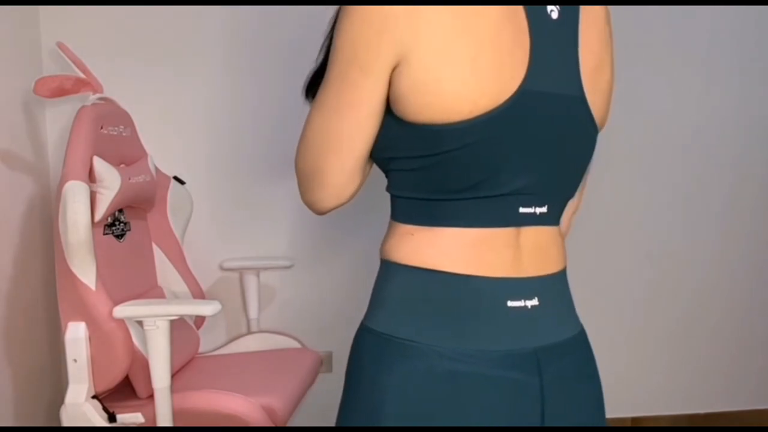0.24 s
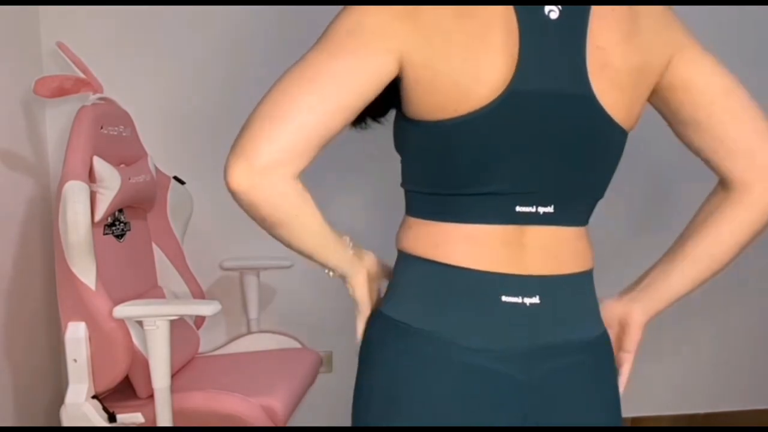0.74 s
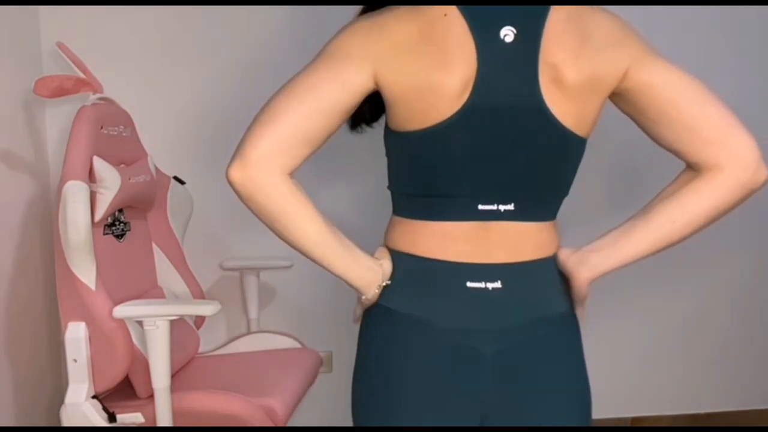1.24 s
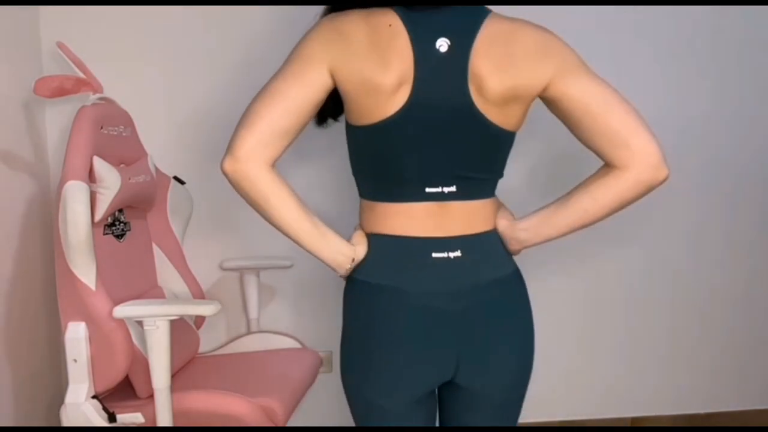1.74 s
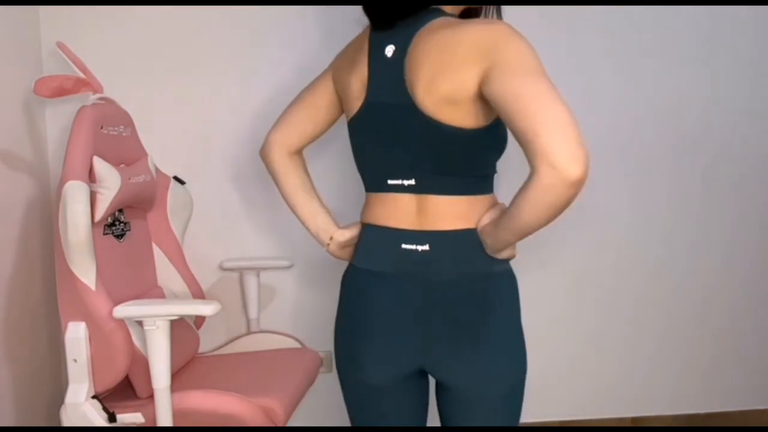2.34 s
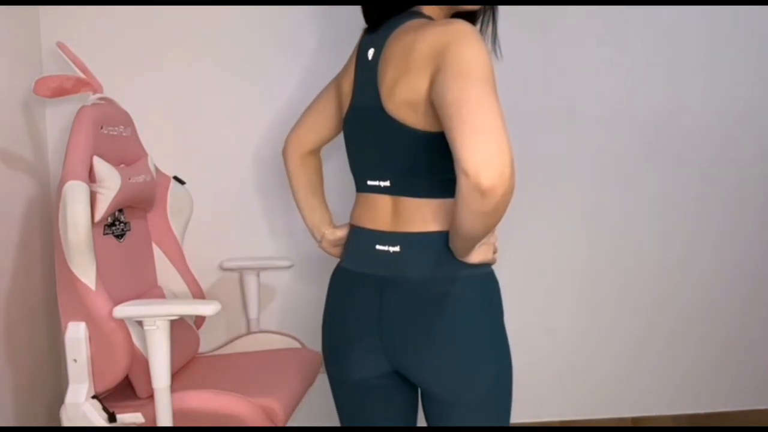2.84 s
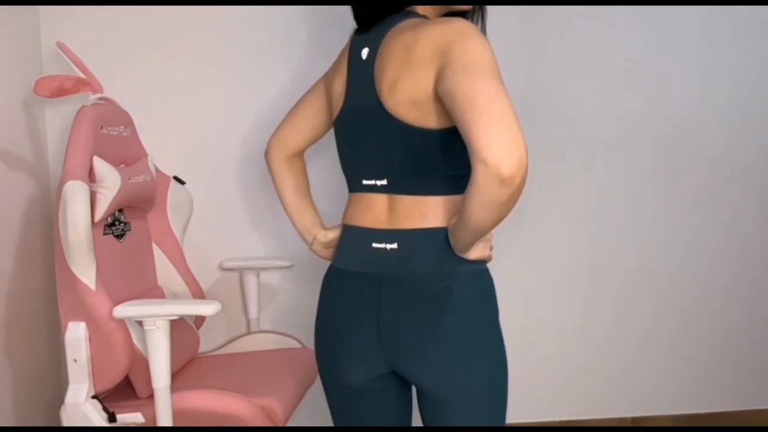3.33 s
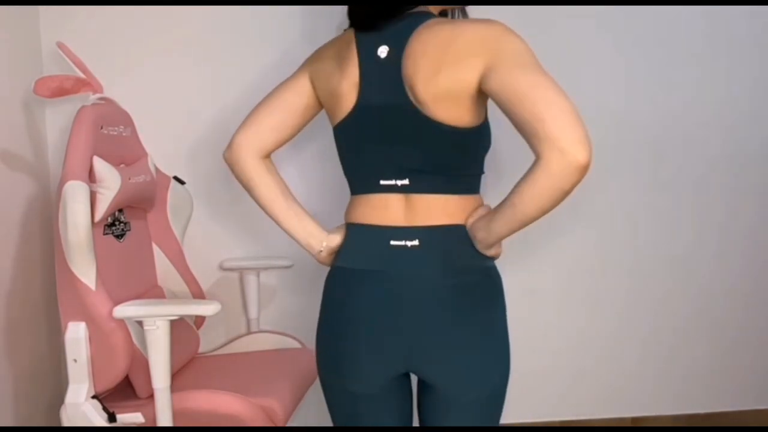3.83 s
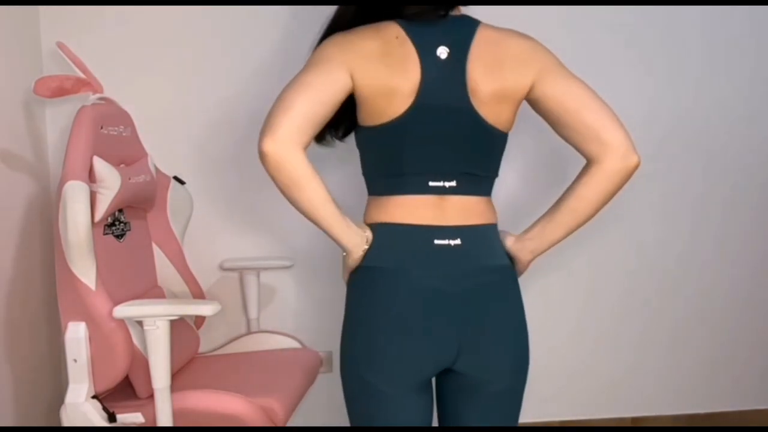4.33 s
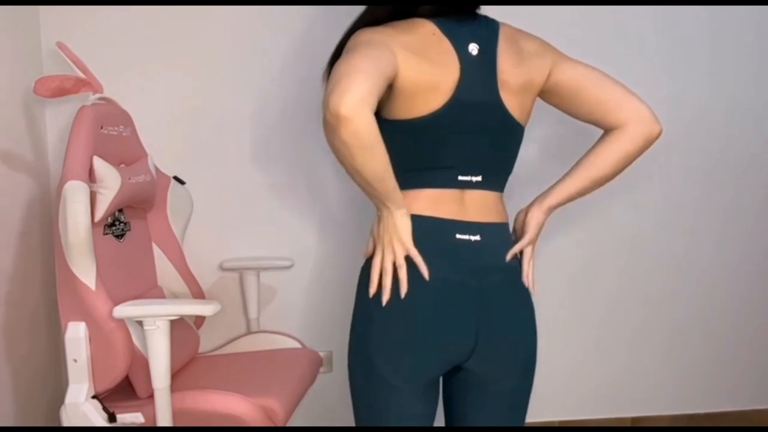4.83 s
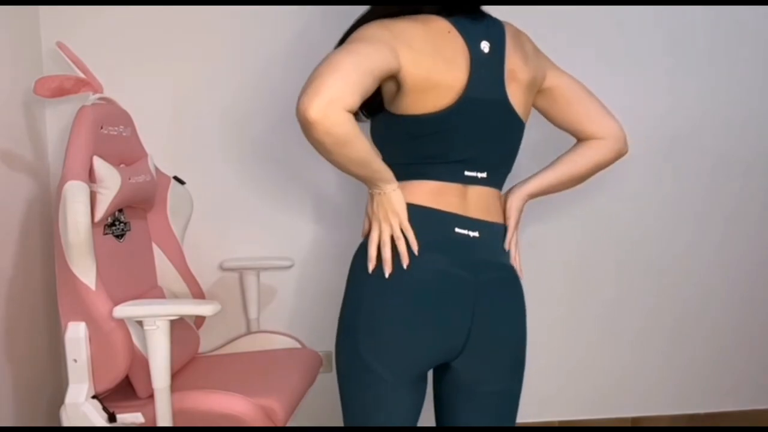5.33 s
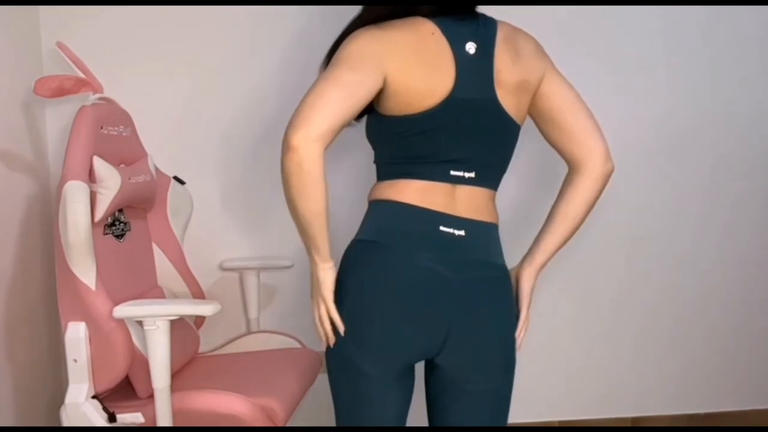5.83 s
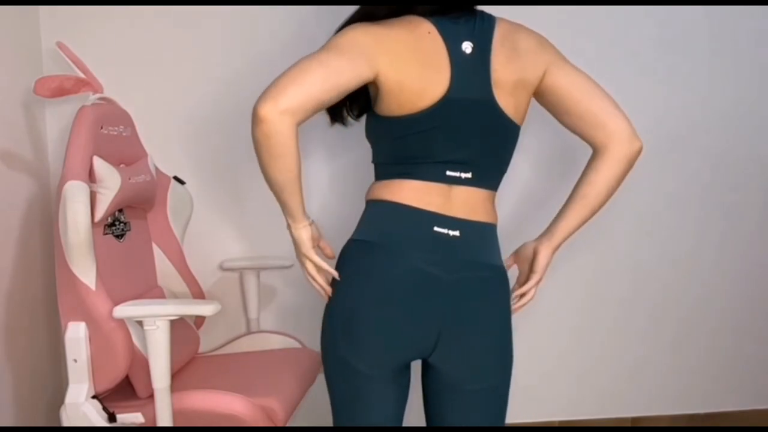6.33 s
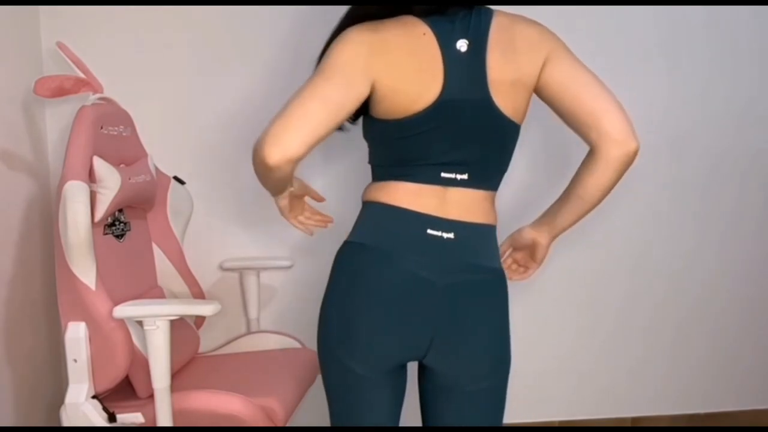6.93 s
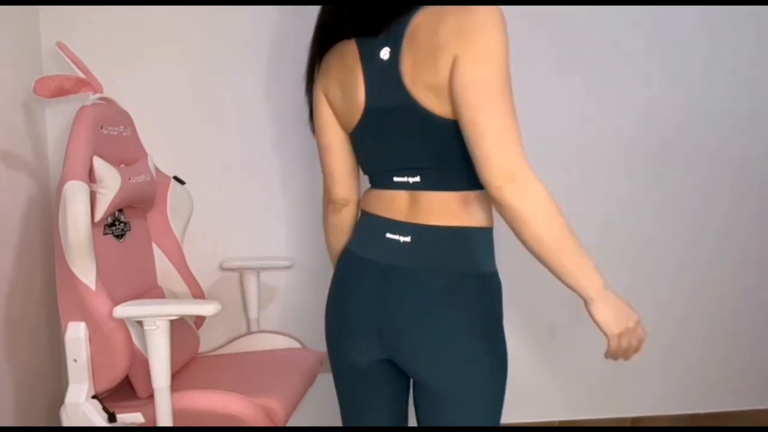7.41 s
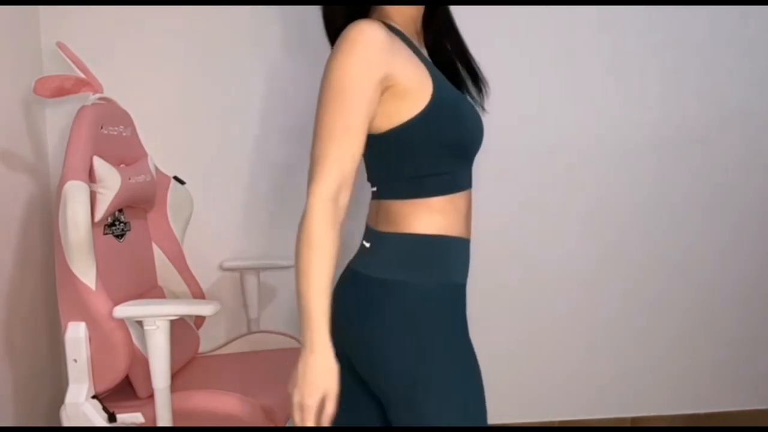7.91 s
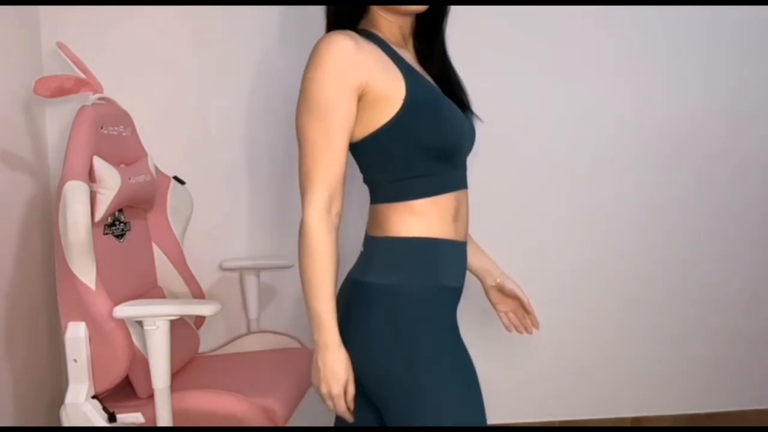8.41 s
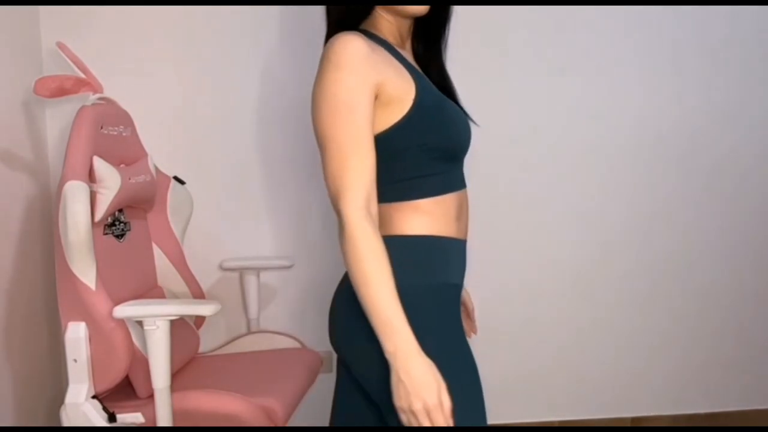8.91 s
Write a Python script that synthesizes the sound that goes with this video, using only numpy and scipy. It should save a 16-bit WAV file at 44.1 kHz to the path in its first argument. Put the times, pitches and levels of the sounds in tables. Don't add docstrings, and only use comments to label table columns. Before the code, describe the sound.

Low muffled thumps and bumps on a clothing-worn microphone, with faint patchy fabric rustle, small ticks and a few sharp knocks in a quiet room.

```python
import sys
import numpy as np
from scipy import signal
from scipy.io import wavfile

SR = 44100
rng = np.random.default_rng(int(sys.argv[2]) if len(sys.argv) > 2 else 0)


def to_wav(sig):
    pcm = np.clip(np.atleast_2d(sig), -1, 1) * 32767
    pcm = np.round(pcm).astype(np.int16)
    wavfile.write(sys.argv[1], SR, pcm.T)


def gain_from_decibels(decibels):
    exponent = np.asarray(decibels, float) / 20
    return 10 ** exponent


N = 404037

# f/Hz, density/dB
ROOM_SPECTRUM = [(200, -17), (400, 1.5), (900, -3.5), (1700, -19.5), (7000, -29), (11000, -15.5),
                 (17500, -22)]
# middle t/s, length/s, level/dB, pitch f/Hz
FOLD_WHISPERS = [(.275, .06, -68, 1600), (.565, .07, -66, 1800), (.93, .06, -60, 450),
                 (.99, .04, -62, 2050), (1.46, .14, -57, 3600), (1.85, .12, -55, 2300),
                 (2.19, .15, -60, 500), (2.75, .12, -58, 1800), (3.67, .1, -58, 500),
                 (4.08, .08, -54, 2000), (4.2, .25, -58, 2100), (5.11, .1, -54, 500), (6.04, .1, -58, 2400),
                 (6.16, .14, -55, 2400), (6.28, .08, -55, 2600), (6.44, .14, -63, 500),
                 (7.06, .04, -59, 500), (7.17, .05, -50, 400), (7.54, .06, -56, 600), (7.77, .08, -61, 500),
                 (8.2, .25, -57, 2000), (8.8, .07, -58, 500), (6.69, .04, -60, 2100),
                 (1.33, .05, -58, 2400)]
# t/s, peak level/dB, ring f/Hz, t60/ms
HOUSING_RINGS = [(7.0321, -30, 2000, 3.5), (7.1485, -34, 950, 18), (7.0882, -38, 2300, 4),
                 (7.1524, -35, 2400, 4), (7.301, -38, 1150, 10), (8.665, -41, 650, 14),
                 (8.7516, -34, 1550, 9), (8.7518, -37, 2800, 6), (6.895, -41, 450, 20),
                 (6.3703, -25, 950, 7), (6.5261, -27, 1800, 4.5), (8.666, -44, 2000, 10)]
# t/s, peak level/dB, hiss over peak/dB, ring f/Hz,
# length/ms
TICKS_AND_CRUNCHES = [(1.581, -38, -8, 1700, 3.0), (2.294, -38.5, -17, 3640, 8.7), (3.273, -37, -12, 2220, 5),
                      (3.458, -28.5, -6.5, 1190, 5.6), (3.53, -32, -14, 1180, 6.2), (6.638, -47, -14, 1500, 4),
                      (6.663, -42, -10, 2000, 5), (6.813, -51, -7, 1580, 5.4), (6.86, -52, -13, 1400, 4.6),
                      (6.894, -39, -3, 900, 8), (6.981, -50, -13, 2070, 4.8), (7.084, -33, -6, 1490, 7),
                      (7.147, -31, -6, 820, 7), (7.204, -45, -5, 1960, 7.6), (7.23, -36, -12, 1010, 4.8),
                      (7.301, -28, -6, 980, 3.7), (7.324, -34, -7, 829, 9), (7.62, -35, -12, 970, 7),
                      (7.83, -47, -5, 1180, 2), (8.6615, -36, -3, 1920, 9.1), (8.7495, -33, -4, 2200, 5),
                      (8.786, -37, -3, 2100, 7), (8.819, -36, -3, 2030, 6.7), (8.853, -40.5, 1, 1980, 5.7),
                      (6.389, -40, -14, 2600, 1.9), (6.519, -40, -5, 1600, 8), (7.032, -40, -6, 2000, 2.4),
            (3.425, -38, -25, 600, 8.7), (3.5, -35, -25, 450, 16), (3.552, -37.5, -25, 830, 22),
            (3.578, -42, -20, 700, 20), (4.705, -38, -25, 700, 80), (3.49, -38, -25, 350, 66),
            (4.84, -37, -25, 390, 75), (2.291, -33.5, -22, 530, 8), (7.47, -40, -7, 1070, 25.5)]
# t/s, peak level/dB, hiss over peak/dB, ring f/Hz, length/ms
TINY_FLICKS = [(7.357, -34, -25, 520, 5), (7.073, -44, -8, 2000, 4), (7.9165, -50, 6, 3000, 2),
               (7.855, -55, 6, 3000, 5), (8.473, -55, 10, 3000, 3), (6.815, -50, 0, 2500, 2),
               (1.582, -41, 0, 1500, 1.6), (6.6, -58, 4, 3000, 3), (7.3715, -33, -25, 450, 5),
               (7.143, -40, -10, 1500, 9), (1.144, -40, -20, 600, 7), (6.509, -47, -8, 2700, 9),
               (7.329, -39, -15, 2000, 4)]
# t/s, peak level/dB, rise/ms
HOUSING_SNAPS = [
    (6.3708, -17, 0.97),
    (7.3693, -11, 0.33),
    (7.3278, -26, .4),
    (7.1524, -28, .5),
]

# f/Hz, density/dB
FIBRE_SPECTRUM = [(1800, -35), (3300, 0), (4500, 2), (5800, -0.5), (7200, 3), (8800, -1), (11500, -9.5)]
# f/Hz, density/dB
WEAVE_SPECTRUM = [(750, -16), (1200, 1), (1550, -2.5), (2200, 1), (3000, -2.5), (5500, -20.5)]
# f/Hz, density/dB
DRAG_SPECTRUM = [(120, -0.5), (250, -1), (450, -6), (800, -7.5), (1600, -34.5)]
# f/Hz, density/dB
SIZZLE_SPECTRUM = [(7000, -22), (10500, -11), (13000, -1.5), (17500, -4)]
# t/s, fibre hiss level/dB, coarseness/dB, pressure on capsule/dB
CLOTH_CREEP = [(0, -60.5, -0.5, 3.5), (.22, -67.5, 3, 1.5), (.6, -64.5, 1.5, -0.5), (1.5, -58, -0.5, -3),
               (2.0, -57.5, 4, -0.5), (2.84, -62.5, 6, 1.5), (3.05, -55.5, 2, -1.5), (3.5, -50.5, 0.5, 1),
               (3.77, -50.5, 0.5, 0.5), (4.0, -60.5, 5, -1.5), (4.45, -48.5, -1, -5),
               (4.75, -53.5, 0.5, 4.5), (5.5, -54.5, 1, 0.5), (6.3, -60.5, 5.5, 0.5),
               (6.57, -72.5, 5.5, 2.5), (7.55, -57.5, 2.5, 2), (7.9, -62.5, 1.5, -1),
               (9.16, -64.5, 6.5, 1.5)]
# start t/s, length/s, fibre hiss level/dB, coarseness/dB
CLOTH_STROKES = [(0.227, .36, -69.5, -0.5), (0.888, .11, -57, -4.5), (1.007, .54, -57.5, -3),
                 (1.422, 0.15, -61.5, -3), (1.772, 0.39, -55.5, -3.5), (1.917, .07, -48, -11.5),
                 (2.023, 0.079, -55.5, -3), (2.134, 0.072, -49.5, -3), (2.227, 0.069, -61.5, 6),
                 (2.326, 0.48, -59.5, 0), (2.85, 0.23, -66, 0), (4.023, 0.13, -55.5, 3.5),
                 (4.158, 0.15, -52, -2), (4.378, 0.12, -64, -4), (4.511, .07, -51.5, -4),
                 (4.72, .42, -58.5, -1), (5.137, 0.23, -47, -7.5), (5.36, .18, -48.5, -4),
                 (5.577, 0.057, -52, -5.5), (5.657, .28, -55.5, -6), (5.974, 0.467, -57, 1.5),
                 (6.632, .31, -64.5, 6), (7.164, 0.052, -57.5, -2), (7.26, 0.1, -55, 0),
                 (7.5, 0.33, -68, 2), (7.977, 0.43, -54, -1.5), (8.405, .13, -57.5, 0.5),
                 (8.517, .14, -60.5, 0), (8.825, 0.23, -58, 0), (9.06, 0.071, -55, -1.5)]
# middle t/s, length/ms, change of sliding level/dB
SURGES = [(.61, 60, -5), (.80, 150, 2), (.99, 40, 3), (1.12, 60, -4), (1.32, 70, -0.5), (1.42, 90, 2),
          (1.68, 120, -2), (2.07, 80, -2), (2.11, 70, -3), (2.42, 120, -3), (3.01, 70, 2), (3.10, 110, -2),
          (3.34, 60, 3), (3.43, 50, 2), (3.57, 60, 2), (3.67, 80, 3), (3.715, 40, 3), (3.78, 50, -3),
          (3.86, 90, -3), (3.93, 120, 2), (4.15, 60, 1.5), (4.21, 70, -3), (4.33, 80, 4), (4.49, 80, -3),
          (4.63, 80, 3), (4.69, 40, -4), (4.75, 100, -3), (5.07, 55, -3), (5.25, 60, -3), (5.48, 55, -3),
          (5.52, 70, 3), (5.86, 130, -4), (6.10, 80, -2), (6.36, 70, 5), (6.46, 110, 3), (6.53, 100, 6),
          (6.60, 110, 2.5), (2.835, 70, -4), (6.85, 70, -4), (7.42, 60, -3), (7.85, 50, 3), (7.9, 90, -3),
          (6.68, 120, -3), (6.8, 120, -3), (7.10, 90, 4), (7.6, 50, -3), (8.16, 140, 4), (8.32, 80, -3),
          (8.38, 50, -2), (8.57, 60, -2), (8.74, 40, 3), (9.03, 50, -3)]
# t/s, sheen/dB, finest sizzle/dB
KNIT_TAUTNESS = [(0, -1, -1), (.8, 0, 0), (1.3, -3, -2), (1.95, 0, 4), (2.3, -1, 0), (2.9, 0, -2),
                 (3.3, 0, 2), (4.3, 0, 2), (5.0, -1, -4), (5.2, 1, 0), (5.5, 0, -2), (6.1, 0, -1),
                 (6.5, 1, 2), (6.7, -2, -2), (7.1, 1, 1), (7.55, 0, -5), (8.15, 1, 1), (9.16, -1, 0)]
# t/s, level/dB, length/ms
HISSING_SLIPS = [(5.1075, -35, 11.5), (5.134, -34, 12), (5.155, -39, 14), (6.892, -55, 18),
                 (7.045, -57, 13), (7.081, -58, 15), (7.135, -53, 21), (7.355, -51, 37), (7.262, -54.5, 26),
                 (7.54, -52, 29), (9.1, -55, 130), (8.21, -59, 62), (9, -59, 60), (5.168, -43, 60),
                 (5.8, -54, 56), (5.385, -48.5, 46), (.91, -59.5, 39), (2.55, -59, 60), (4.7, -48, 97),
                 (1.83, -53, 77), (6.26, -56, 64), (5.75, -55, 83), (1.3, -64, 60), (7.61, -58, 42),
                 (8.41, -55.5, 40), (2.292, -55, 16), (8.872, -55, 14), (8.79, -55, 16), (1.07, -57, 26)]

# t/s, sway level/dB, quick bumps over sway/dB
RESTLESSNESS = [(0.0, -51.5, -7), (2.47, -50, -5.5), (3.03, -55.5, -1), (3.47, -45.5, -3.5),
                (3.62, -43, -2), (3.83, -53, -2.5), (4.49, -52.5, -2.5), (4.74, -50, -4),
                (5.28, -45.5, -6.5), (5.71, -49.5, -6.5), (6.43, -43.5, -2), (6.94, -51.5, -4),
                (7.24, -43, -2), (7.53, -46, -4.5), (8.09, -52, -5), (8.54, -52, -6), (8.83, -48, -0.5),
                (9.16, -46, -2.5)]
# middle t/s, length/s, quick bumps level/dB
WEIGHT_TREMORS = [(.53, .15, -57), (1.46, .2, -55), (1.9, .14, -52), (2.207, 0.25, -52), (2.72, 0.22, -48),
                  (3.006, 0.13, -55), (4.11, 0.21, -52), (4.75, .25, -46), (5.79, 0.44, -49),
                  (7.742, 0.18, -48), (8.318, 0.21, -53), (8.917, 0.43, -53), (1.19, .08, -46),
                  (1.29, .1, -54), (1.76, .07, -48), (2.08, .05, -50), (2.41, .06, -49), (3.33, .05, -46),
                  (4.41, .1, -47), (4.55, .08, -53), (3.08, .2, -52), (.17, .15, -58), (6.0, .12, -51),
                  (5.61, .07, -49), (6.10, .06, -49), (6.24, .06, -46), (6.98, .06, -53), (7.65, .08, -45),
                  (8.0, .1, -56), (8.84, .06, -45), (9.0, .06, -45)]
# t/s, level/dB, contact/ms, direction (-1 pull, +1 push)
SHARP_KNOCKS = [(3.557, -25.5, 2.5, 1), (6.367, -20, 4.5, 1), (6.3698, -11, 2.02, 1), (6.3755, -21, 6.4, 1),
                (6.5227, -19, 5.5, -1), (7.0882, -25.5, 2, 1), (7.1532, -36, 2.2, 1),
                (7.3039, -27.5, 2.2, 1), (7.37, -24, 1.3, 1), (0.835, -43, 2.9, -1), (1.146, -31, 6.6, 1),
                (6.5218, -33, 1.8, 1), (6.5288, -31, 4, -1), (7.357, -29, 4, -1)]
# t/s, level/dB, contact/ms, direction (-1 pull, +1 push)
THREAD_TUGS = [
    (7.857, -36, 0.5, -1),
    (7.9163, -34, 1.4, -1),
    (7.9492, -34, 0.42, -1),
    (1.5817, -36, .4, 1),
    (7.975, -40, .35, -1),
    (8.0177, -35, .5, -1),
    (8.0513, -30, .12, -1),
    (7.0848, -32, 1.9, -1),
    (7.1508, -27, 2, -1),
    (7.1482, -32, 2, -1),
]
# t/s, level/dB, contact/ms, direction (-1 pull, +1 push)
HEAVY_JERKS = [
    (6.383, -23.5, 20, 1),
    (6.518, -15.5, 15, 1),
    (7.083, -16.5, 9.5, -1),
    (7.145, -15.5, 12.7, -1),
]
# t/s, level/dB, contact/ms
FOOT_ROLL = [
    (3.42, -27, 12.6),
    (3.459, -22, 10.6),
    (3.503, -23, 10),
    (3.53, -18, 6.5),
    (3.556, -20, 3.5),
    (3.577, -25, 5.4),
    (3.622, -26.5, 17),
]
# t/s, level/dB, contact/ms
TUGS_AWAY = [(1.407, -31, 16.4), (1.528, -36, 8.3), (2.549, -33, 12.6), (3.197, -30.5, 24),
             (3.29, -31.5, 10), (3.765, -32, 5.3), (4.372, -32, 9.6), (4.711, -28, 14),
             (4.724, -24.5, 10.4), (4.737, -33, 4.5), (4.85, -32, 6.6), (4.894, -29.5, 6.4),
             (5.109, -20.5, 11), (5.131, -20.5, 18), (5.288, -26, 27), (6.167, -32, 18), (6.286, -27, 10.5),
             (6.663, -28, 7), (6.679, -23.5, 10.3), (6.69, -19.5, 10.7), (6.892, -20, 14.6),
             (7.044, -30.5, 16), (7.205, -29.5, 10.5), (7.299, -14.5, 9), (7.321, -22, 14),
             (7.351, -25, 16), (7.37, -17, 12.2), (8.656, -32, 12), (8.856, -33, 10.4), (8.895, -34, 8.7),
             (8.255, -35, 12), (8.283, -36, 10), (8.323, -35, 14), (6.59, -35, 16), (1.922, -34, 12),
             (2.088, -34, 11), (9.094, -33, 14), (7.06, -32, 9)]
# t/s, level/dB, contact/ms
NUDGES_IN = [(1.049, -32.5, 8.7), (2.163, -33, 15), (2.263, -30.5, 8.9), (2.292, -26, 8.9),
             (2.492, -30.5, 8.1), (3.275, -27.5, 5.8), (3.605, -30.5, 4), (4.684, -33, 15),
             (5.162, -24.5, 16), (6.152, -30, 15), (6.268, -30.5, 12), (6.304, -27, 9.9),
             (6.712, -30.5, 14.5), (6.906, -33, 4.7), (8.58, -30, 23), (8.6675, -23.5, 12.5),
             (8.776, -32, 21), (1.188, -34, 12), (8.944, -34, 12), (8.988, -35, 11), (8.88, -33, 9)]

ROOM_DB = -64
FOLD_WIDTH = 0.22
ATTACK_S, RELEASE_S = 0.056, 0.053
DRAG_DB, DRAG_PER_COARSENESS, DRAG_PER_PRESSURE = -4, 0.85, 0.65
SIZZLE_DB, SIZZLE_PER_COARSENESS, SIZZLE_PER_PRESSURE = -9, 0.77, 1
SLIP_RASP_DB, SLIP_SHEEN_DB = -10.5, -5.5
BUMPS_FOLLOW = 0.51
MOUNT_HZ, MOUNT_Q = 41.8, 1.35
REBOUND_S, REBOUND_DB, REBOUND_MS = 0.0177, -11, 17.5
END_FADE_S = 0.045


def rms_one(x):
    return x / np.sqrt(np.mean(x ** 2) + 1e-20)


def in_time(rows):
    s, *columns = np.transpose(rows)
    return [np.interp(np.arange(N) / SR, s, column) for column in columns]


def drift(rate_hz):
    pole = np.exp(-80 * np.pi * rate_hz / SR)
    noise = rng.standard_normal(N // 40 + 2002)
    slow = signal.lfilter([1], [1, -2 * pole, pole * pole], noise)[2000:]
    return np.interp(np.arange(N) / 40, np.arange(len(slow)), rms_one(slow))


def band(x, low_hz, high_hz):
    edges = [low_hz, min(high_hz, 0.45 * SR)]
    return signal.sosfilt(signal.butter(2, edges, "band", fs=SR, output="sos"), x)


def bump(length_s):
    return np.hanning(int(length_s * SR))


def add(out, s, piece):
    at = round(s * SR)
    out[at:at + len(piece)] += piece[:N - at]


def slips(per_s, spread_db):
    sizes = gain_from_decibels(spread_db * np.minimum(rng.exponential(size=N), 4))
    signed = sizes * rng.choice([-1, 1], N)
    return rms_one(signed * (rng.random(N) < per_s / SR))


def coloured(sources, spectrum, patchy_db):
    hz, db = np.transpose(spectrum)
    edges = np.geomspace(hz[0], hz[-1], num=int(3 * np.log2(hz[-1] / hz[0])) + 2)
    out = np.zeros(N)
    for k, (low, high) in enumerate(zip(edges, edges[1:])):
        level_db = np.interp(np.log(low * high) / 2, np.log(hz), db)
        flicker = gain_from_decibels(level_db + patchy_db * drift(5.6))
        out += flicker * band(sources[k % 2], low, high)
    return rms_one(out)


def room():
    return gain_from_decibels(ROOM_DB - 3.5) * coloured(rng.standard_normal((2, N)), ROOM_SPECTRUM, patchy_db=5.0)


def folds():
    out = np.zeros(N)
    noise = rng.standard_normal((len(FOLD_WHISPERS), 16000))
    for (s, length_s, db, hz), air in zip(FOLD_WHISPERS, noise):
        swell = bump(length_s)
        whisper = rms_one(band(air, hz * (1 - FOLD_WIDTH), hz * (1 + FOLD_WIDTH)))
        add(out, s - length_s / 2, gain_from_decibels(db) * swell * whisper[-len(swell):])
    return out


def rings():
    out, t = np.zeros(N), np.arange(2000) / SR
    for s, db, hz, t60_ms in HOUSING_RINGS:
        decay = gain_from_decibels(db - 60000 * t / t60_ms)
        add(out, s, -decay * np.sin(2 * np.pi * hz * t))
    return out


def ticks(rows):
    out = np.zeros(N)
    noise = rng.standard_normal((len(rows), 2, 6000))
    for (s, db, hiss_db, hz, length_ms), (dull, bright) in zip(rows, noise):
        swell = bump(1.3 * length_ms / 1000)
        ring = band(band(dull, 0.25 * hz, 1.58 * hz), 0.2 * hz, 2.35 * hz)
        hiss = band(bright, 3000, 15800)
        body = rms_one(swell * ring[-len(swell):]) * gain_from_decibels(db - 14.0)
        spit = rms_one(swell * hiss[-len(swell):]) * gain_from_decibels(db + hiss_db - 12.0)
        add(out, s - 0.001, body + spit)
    return out


def snaps():
    out, t = np.zeros(N), np.arange(-200, 500) / SR
    for s, db, rise_ms in HOUSING_SNAPS:
        release = np.tanh(t * 6000 / rise_ms)
        settle = np.where(t < 0, 0.69 * np.exp(t / 0.00097), np.exp(-t / 0.00083))
        add(out, s - 200 / SR, gain_from_decibels(db) * release * settle)
    out += 1e-18
    dull = signal.sosfilt(signal.butter(6, 2350, fs=SR, output="sos"), out)
    return dull + gain_from_decibels(-2) * band(out, 6500, 17000)


def sliding_speed():
    creep_db, creep_coarse_db, pressure_db = in_time(CLOTH_CREEP)
    speed = gain_from_decibels(creep_db)
    weighted = speed * creep_coarse_db
    for s, length_s, db, coarse_db in CLOTH_STROKES:
        t = np.arange(int(length_s * SR)) / SR
        rise, fall = min(ATTACK_S, length_s / 2), min(RELEASE_S, length_s / 2)
        stroke = gain_from_decibels(db) * np.clip(np.minimum(t / rise, (length_s - t) / fall), 0, 1)
        add(speed, s, stroke)
        add(weighted, s, coarse_db * stroke)
    return 20 * np.log10(speed), weighted / speed, pressure_db


def rub(slide_db, coarse_db, pressure_db):
    drag_db = DRAG_DB + DRAG_PER_COARSENESS * coarse_db + DRAG_PER_PRESSURE * pressure_db
    sizzle_db = SIZZLE_DB + SIZZLE_PER_COARSENESS * coarse_db + SIZZLE_PER_PRESSURE * pressure_db
    sheen_db, fuzz_db = in_time(KNIT_TAUTNESS)

    stutter_db = np.zeros(N)
    for s, length_ms, db in SURGES:
        add(stutter_db, s - length_ms / 2000, db * bump(length_ms / 1000))
    sliding = gain_from_decibels(slide_db + stutter_db + 0.54 * drift(10.5) + 1.0 * drift(23.6))
    freed = np.zeros(N)
    for s, db, length_ms in HISSING_SLIPS:
        add(freed, s, gain_from_decibels(db) * bump(length_ms / 1000))

    fine = [slips(14000, 3.0), slips(14000, 3.0)]
    finest = [slips(20000, 5.0), slips(19000, 4.0)]
    medium = [slips(8000, 4.4), slips(8000, 2.95)]
    coarse = [slips(1500, 0.85), slips(1500, 3.0)]

    fibres = coloured(fine, FIBRE_SPECTRUM, patchy_db=0.8)
    sheen = (gain_from_decibels(sheen_db) - 1) * band(fibres, 5000, 12000)
    sizzle = gain_from_decibels(sizzle_db + fuzz_db - 0.5) * coloured(finest, SIZZLE_SPECTRUM, patchy_db=-1.0)
    hiss = fibres + sheen + sizzle
    rasp = gain_from_decibels(coarse_db - 1.83) * coloured(medium, WEAVE_SPECTRUM, patchy_db=0.9)
    drag = gain_from_decibels(drag_db - 0.5) * coloured(coarse, DRAG_SPECTRUM, patchy_db=1.5)

    steady = sliding * (rasp + drag + hiss)
    bright = gain_from_decibels(SLIP_SHEEN_DB) * band(hiss, 5900, 10300)
    return steady + freed * (gain_from_decibels(SLIP_RASP_DB) * rasp + hiss + bright)


def mount(force):
    w = 2 * np.pi * MOUNT_HZ
    b, a = signal.bilinear([1, 0, 0], [1, w / MOUNT_Q, w * w], SR)
    return signal.lfilter(b, a, force + 1e-18)


def shake(slide_db):
    sway_db, quick_db = in_time(RESTLESSNESS)
    bump_db = sway_db + quick_db + BUMPS_FOLLOW * (slide_db - slide_db.mean())
    bump_level = gain_from_decibels(bump_db - 2.0)
    for s, length_s, db in WEIGHT_TREMORS:
        add(bump_level, s - length_s / 2, gain_from_decibels(db) * bump(length_s))
    short = signal.fftconvolve(slips(110, 3.4), bump(0.0076))[:N]
    long = signal.fftconvolve(slips(70, 3.3), bump(0.021))[:N]
    wander = rms_one(band(rng.standard_normal(N), 7.1, 30.2))
    sway = rms_one(rms_one(mount(long)) + gain_from_decibels(4.5) * wander)
    return gain_from_decibels(sway_db + 1.5) * sway + bump_level * rms_one(band(short, 50.4, 230))


def jolts():
    rebounds = [(s + REBOUND_S, db + REBOUND_DB, REBOUND_MS) for s, db, _, _ in HEAVY_JERKS]
    pulls = [(*row, -1) for row in FOOT_ROLL + TUGS_AWAY + rebounds]
    pushes = [(*row, 1) for row in NUDGES_IN]
    force = np.zeros(N)
    for s, db, contact_ms, direction in pulls + pushes + HEAVY_JERKS + SHARP_KNOCKS + THREAD_TUGS:
        add(force, s, direction * gain_from_decibels(db) * bump(contact_ms / 1000))
    return mount(force)


def scene():
    slide_db, coarse_db, pressure_db = sliding_speed()
    mix = room() + folds() + rings()
    mix += ticks(TICKS_AND_CRUNCHES) + ticks(TINY_FLICKS) + snaps()
    mix += rub(slide_db, coarse_db, pressure_db) + shake(slide_db) + jolts()
    fade = np.clip(np.arange(N)[::-1] / SR / END_FADE_S, 0.25, 1)
    return (fade * mix)[None]


def roll_off(x):
    return signal.sosfilt(signal.butter(12, 16650, fs=SR, output="sos"), x)


def record(dry):
    top_cut = signal.cheby2(24, 45, 15750, fs=SR, output="sos")
    mix = signal.sosfilt(top_cut, dry)
    return roll_off(mix)


dry = scene()
out = record(dry)
to_wav(out)
```